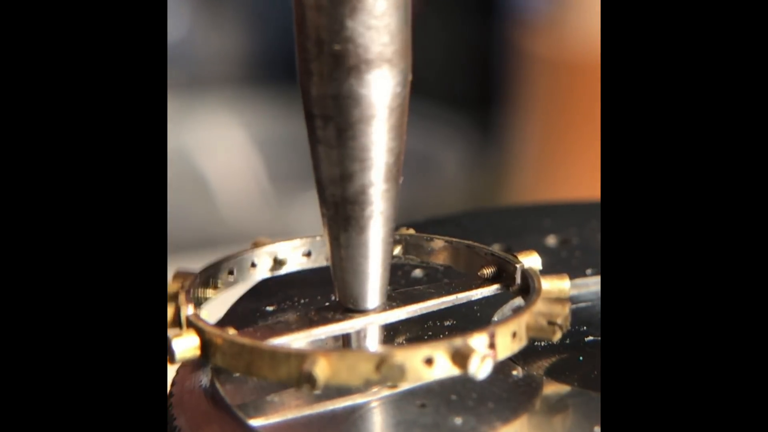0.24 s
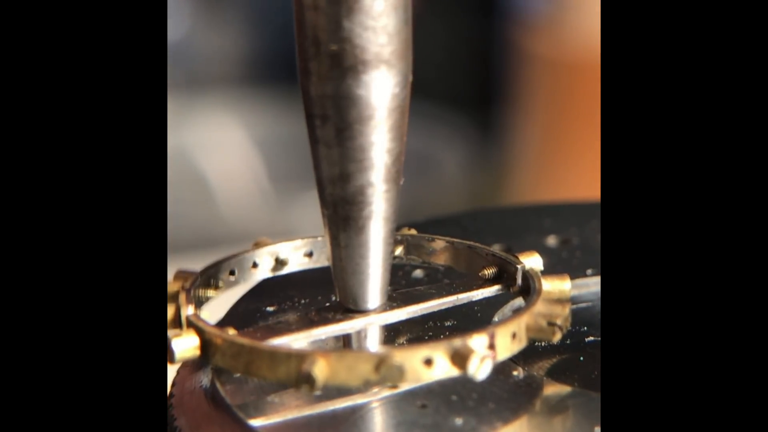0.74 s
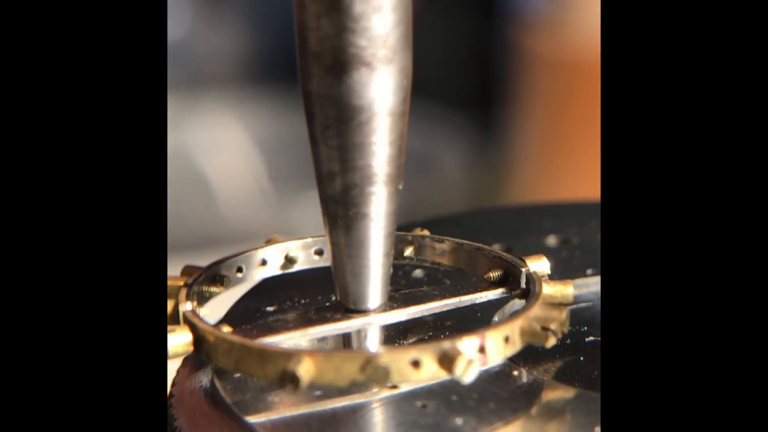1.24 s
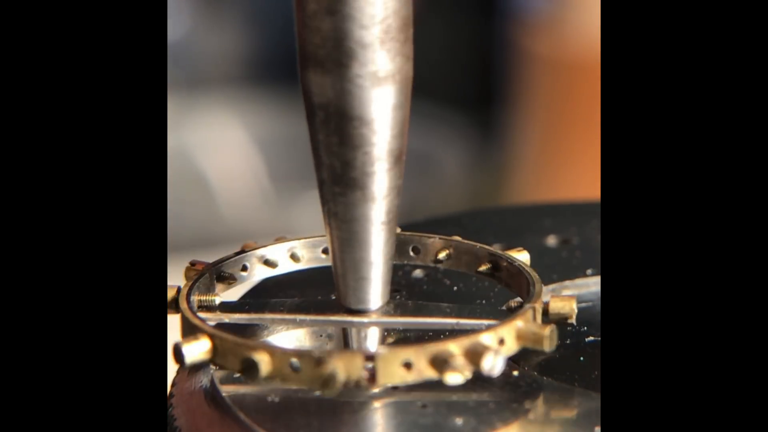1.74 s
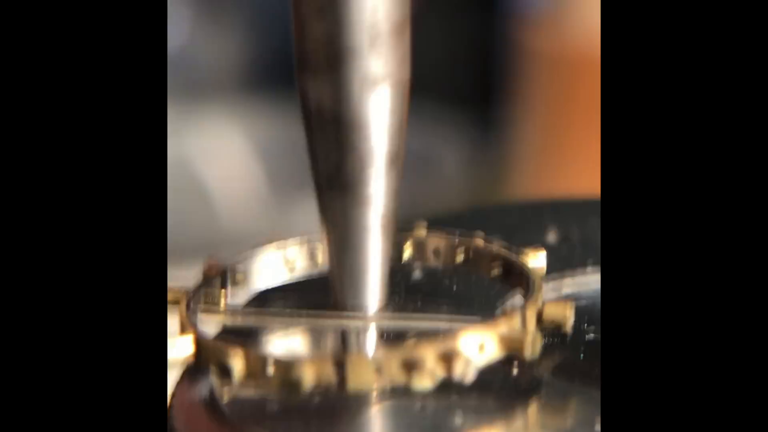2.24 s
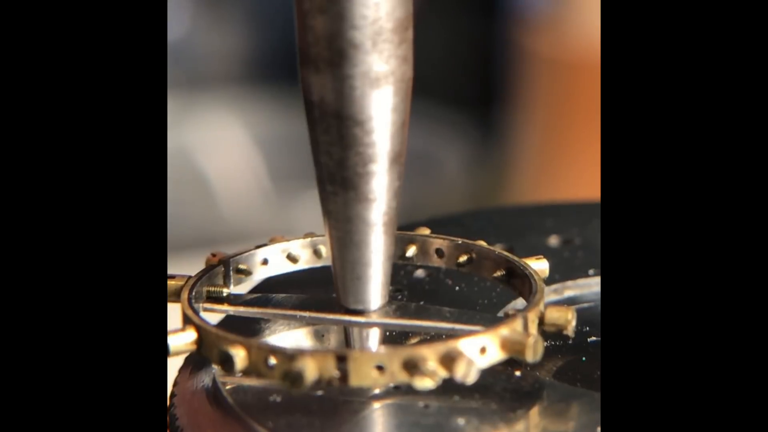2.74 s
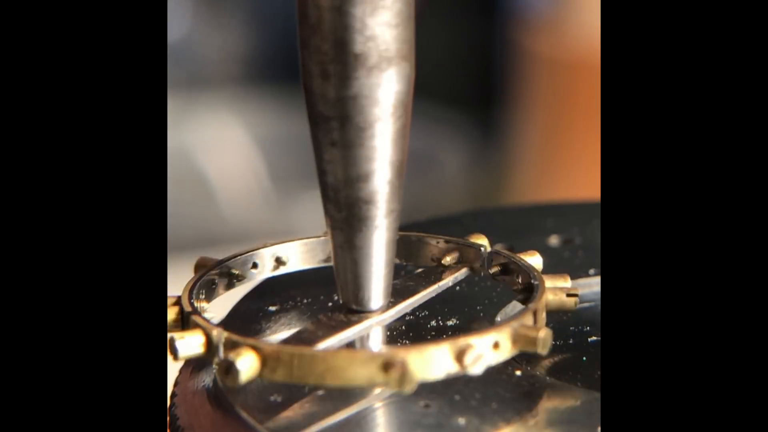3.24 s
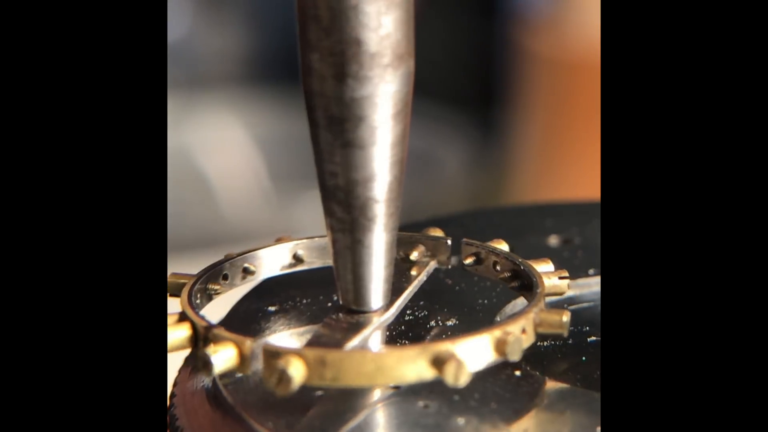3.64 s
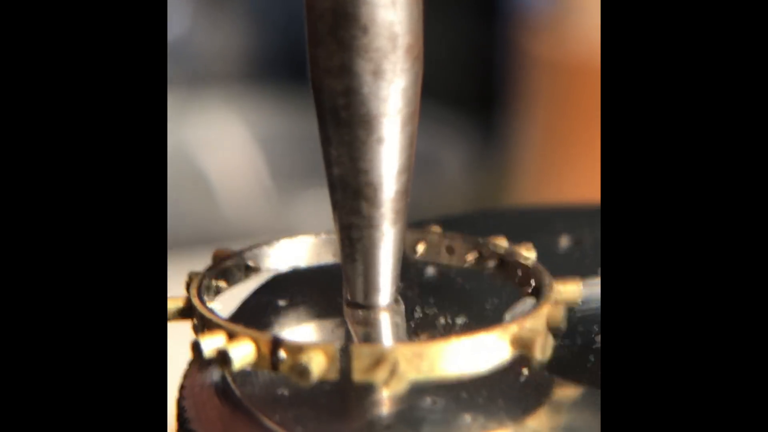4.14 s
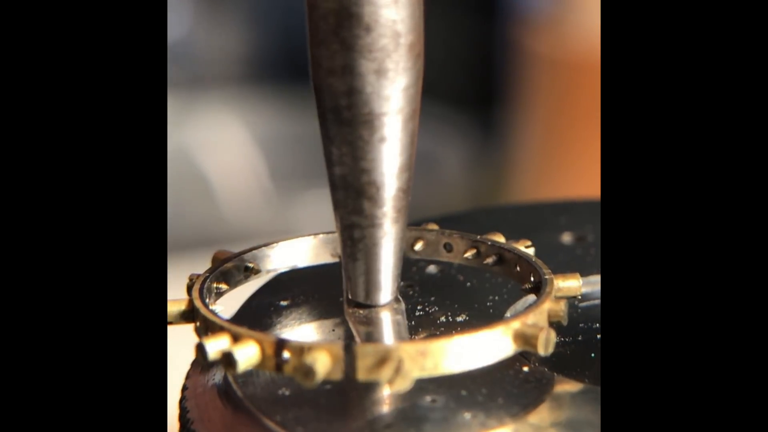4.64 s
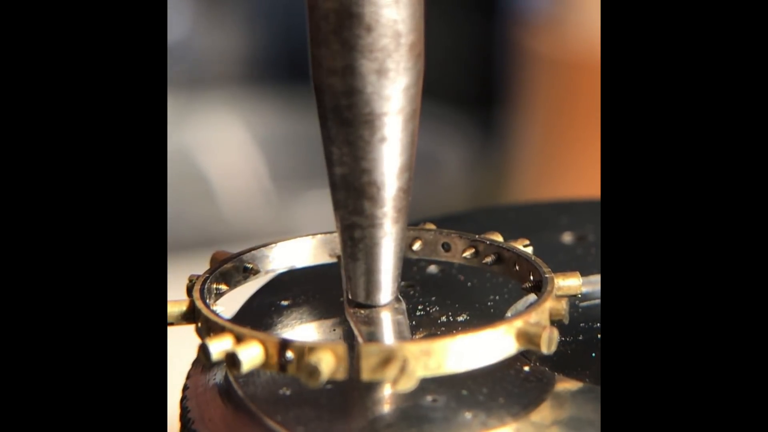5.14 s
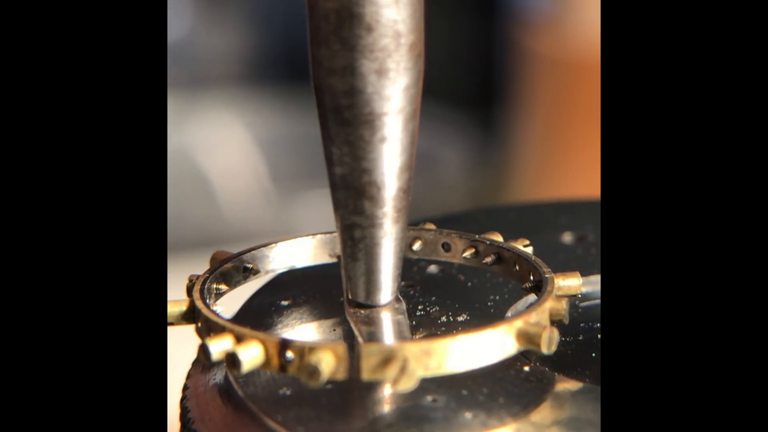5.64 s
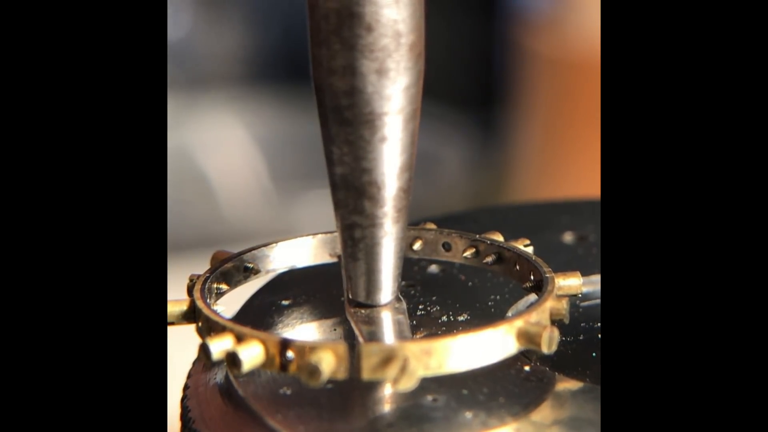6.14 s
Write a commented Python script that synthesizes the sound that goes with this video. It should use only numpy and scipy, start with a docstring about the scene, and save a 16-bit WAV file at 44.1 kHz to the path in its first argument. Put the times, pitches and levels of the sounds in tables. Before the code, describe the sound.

A small hammer taps a steel punch at a workbench: three quick taps, a pair, then another pair. Each is a sharp, close metallic clink with a brief high ring and a light thud from the bench. A tiny steel part tinks faintly, and the hammer is laid down with a clack, its wooden handle knocking softly as it rocks to rest. The small room echoes briefly over a faint rumble and hiss.

```python
"""At a watchmaker's bench in a small, lively room, a small hammer taps a steel punch seven times. Faint ticks
are heard just ahead of each close-up tap; then comes a clink of steel and a thud as the punch's stand hits the
bench. Then a small steel part tinks and the hammer is laid down: its head clacks and bounces, its wooden handle
rocks to rest. The room echoes each sound over a low rumble and hiss. A limiter turns down the loudest moments,
so the blows peak at much the same level."""
import sys
import numpy as np
from scipy import signal
from scipy.fft import rfft, irfft, next_fast_len
from scipy.io import wavfile
from scipy.ndimage import uniform_filter1d, minimum_filter1d

SR = 44100
rng = np.random.default_rng(int(sys.argv[2]) if len(sys.argv) > 2 else 0)


def to_wav(sig):
    """Store sig (one row per channel, or 1-D mono) as 16-bit WAV at the path in sys.argv[1].

    Samples outside -1..1 are clipped; the rate is SR.
    """
    pcm = np.clip(np.atleast_2d(sig), -1, 1) * 32767
    pcm = np.round(pcm).astype(np.int16)
    wavfile.write(sys.argv[1], SR, pcm.T)  # frames by channels


N = 281799
T = np.arange(int(1.2 * SR)) / SR  # time since a blow, in seconds

# Levels are relative. A fade_s is the time a sound takes to drop by 60 dB.
# the room's rumble and hiss: pitch_hz, level_db
AIR_SPECTRUM = [(15, -54), (25, -16.5), (44, 1.5), (64, 2), (91, -16.5), (107, 1), (140, -11.5), (209, -3),
                (246, -10), (289, -6.5), (537, -21.5), (648, -15), (1240, -24.5), (3630, -28.5),
                (15500, -38)]
# hammer blows on the punch: start_s, strength_db, ping_db
TAPS = [(.2561, 0, -24.5), (0.6396, 1, -27), (0.9913, 2, -26), (2.35, 0, -19), (2.75, 2.5, -21.5),
        (4.2332, -0.5, -19), (4.6170, 2.5, -19.5)]
# faint ticks just before every blow: ahead_s, level_db
LEAD_TICKS = [(.0232, -31), (.011, -32)]
# the steel's crack, a crowd of very short tones: pitch_hz, level_db
CRACK_SPECTRUM = [(25, -26.5), (100, -9), (300, -1), (420, 2.5), (1000, -0.5), (1800, -3), (3200, 4),
                  (6000, -15.5), (9500, -2.5), (12000, -9), (14000, -8), (16500, -1.5)]
# tones of the punch and its steel stand: pitch_hz, level_db, fade_s
STEEL_TONES = [(200, -16.5, 0.028), (550, -24.5, 0.021), (653.8, -53, 2.3), (1002.3, -14, 0.064),
               (1352, -22.5, .04), (2091, -16, 0.055), (2857, -12.5, 0.027), (3280, -16, 0.023),
               (4070, -21, 0.04), (4242, -20, 0.057), (5340, -5, 0.03), (6164, -19, 0.061),
               (7445, -14.5, 0.064), (9610, -19.5, 0.023), (9240, -33, 0.12), (10860, -8.5, 0.021),
               (11820, -23.5, 0.036), (13000, -27.5, 0.0057)]
# tones of the hammer head: pitch_hz, level_db, fade_s
HEAD_TONES = [(8317, 0, .17), (11950, -25, .2)]
# tones of the bench top under the stand: pitch_hz, level_db, fade_s
BENCH_TONES = [(56.3, -36.5, .3), (96, -13.5, 0.032), (111, -25.5, 0.14), (132, -28, 0.12),
               (165.6, -24.5, 0.12), (200, -8, .022), (251.5, -25.5, 0.23), (348.3, -36, .35),
               (574, -21, 0.036), (946.7, -10, 0.014), (1256, -34, 0.078), (1414, -20.5, .025)]
# the room's early and late echoes: pitch_hz, level_db
EARLY_SPECTRUM = [(40, -10.5), (120, -4), (260, 8.5), (500, -9), (1050, 3.5), (1700, -1.5), (2200, 1.5),
                  (3000, 1.5), (4300, 0), (6300, 1.5), (7500, -12), (11000, -8), (13000, -9), (15600, -8.5)]
LATE_SPECTRUM = [(40, -6.5), (140, -10), (260, -6.5), (500, -8), (1000, 4), (1650, -1), (2100, 5),
                 (2600, -2.5), (3300, -4), (4200, 3), (4800, -6), (5300, 2.5), (6300, -0.5), (7500, -10),
                 (15600, -13)]
# how long those echoes last: pitch_hz, fade_s
EARLY_FADES = [(100, 0.6), (1000, 0.44), (5000, 0.19), (10000, 0.36), (15600, 0.13)]
LATE_FADES = [(100, 0.55), (1000, 0.94), (2500, 0.91), (6000, 0.83), (15000, 0.22)]
# a thin hiss that hangs on after every blow: pitch_hz, level_db
HISS_SPECTRUM = [(100, -10), (3000, -1.5), (8000, 1), (15000, -2)]
# light touches on a small steel part: start_s, level_db
TINKS = [(5.279, -56), (5.906, -33.5)]
# tones of that part: pitch_hz, level_db, fade_s
PART_TONES = [(4190, 0.5, .035), (5600, -5, .02), (6500, -4, 0.022)]
# the hammer head landing, bouncing and tipping over: start_s, level_db, dull_above_hz
HEAD_CLACKS = [(5.6740, -3, 8550), (5.6770, -9.5, 4455), (5.6909, -5.5, 2600), (5.831, -31.5, 4030)]
# tones of the hammer hitting wood: pitch_hz, level_db, fade_s
WOOD_TONES = [(171, -38.5, 0.037), (304, -26.5, 0.026), (412, -27, 0.053), (659, -23.5, 0.052),
              (1046, -9, 0.0095), (1415, -13, 0.018), (2082, -7, 0.033), (2410, -10, 0.0197),
              (3150, -19.5, 0.019), (4064, -5, 0.02), (5400, -13.5, 0.021), (6070, -4.5, 0.024),
              (11850, -13, 0.016)]
# the noisy part of that hit: pitch_hz, level_db
CLACK_SPECTRUM = [(60, -15), (400, -14.5), (1200, 0.5), (2300, 7), (4000, 10), (6500, 4), (9000, -0.5),
                  (16000, -9.5)]
# the wooden handle knocking on the bench: start_s, level_db
HANDLE_KNOCKS = [(5.757, -22.5), (5.776, -28), (5.8721, -14.5), (5.95, -22), (5.9744, -23.5),
                 (5.985, -27.5), (6.0031, -27)]
# the handle rocking on the bench: pitch_hz, level_db
ROCKING_SPECTRUM = [(50, -21), (130, -0.5), (300, 1.5), (430, 4.5), (620, -10), (1100, -7), (2200, -32),
                    (3200, -21), (15000, -40)]


def amp(db):
    """Turn decibels into a number to multiply by."""
    return 10 ** (np.asarray(db) / 20)


def unit(x):
    """Scale a sound to an average (rms) level of 1."""
    return x / np.sqrt(np.mean(x ** 2) + 1e-20)


def along(points, hz):
    """Read between the rows of a (pitch_hz, value) table, on a log pitch scale."""
    pitches, values = np.transpose(points)
    return np.interp(np.log(hz + 1), np.log(pitches + 1), values)


def filtered(x, gain_at):
    """Turn each frequency up or down by gain_at(hz)."""
    size = next_fast_len(len(x) + 8192)
    return irfft(rfft(x, size) * gain_at(np.fft.rfftfreq(size, 1 / SR)), size)[:len(x)]


def noise(spectrum, size=len(T)):
    """Noise shaped by a spectrum table, at an average level of 1."""
    return unit(filtered(rng.standard_normal(size), lambda hz: amp(along(spectrum, hz))))


def fade(t, fade_s):
    """A smooth fall that is 60 dB down after fade_s."""
    return np.exp(-np.log(1000) * t / fade_s)


def add(track, start_s, sound):
    """Mix a sound into the track at start_s."""
    part = track[round(start_s * SR):][:len(sound)]
    part += sound[:len(part)]


def ring(tones, scatter_db=2.0):
    """A struck object rings with fading tones, each a little louder or softer at every hit."""
    out = np.zeros(len(T))
    for k, (hz, db, fade_s) in enumerate(tones):
        t = T[:int(2 * fade_s * SR)]
        gain = (-1) ** k * amp(db + scatter_db * rng.standard_normal())  # every other tone is flipped
        out[:len(t)] += gain * np.sin(2 * np.pi * hz * t) * fade(t, fade_s)
    return out


def snap(db):
    """The instant of contact: one click that holds all frequencies."""
    return amp(db) * (T == 0)


def background():
    """The quiet room's steady rumble and hiss."""
    return amp(-62.5) * noise(AIR_SPECTRUM, N)


def taps(walls):
    """Each blow rings the steel; a moment later the stand thuds against the bench."""
    ping_hz, ping_fade_s, thud_delay_s = 15610, .11, .0053
    clink_evening = 0.85  # a harder blow has a louder thud and echo, but its clink stays about as loud
    out = np.zeros(N)
    shared_noise = noise(CRACK_SPECTRUM)  # the crack is much the same at every blow
    for start_s, strength_db, ping_db in TAPS:
        crack = amp(-4.5) * unit(shared_noise + 0.18 * noise(CRACK_SPECTRUM)) * fade(T, 0.022)
        steel = ring(STEEL_TONES)
        clink = amp(-2 - clink_evening * strength_db) * (steel + crack)
        head = head_ring(db=-29)
        ping = ring([(ping_hz, ping_db, ping_fade_s)])  # top steel tone; level depends on the spot hit
        thud = np.zeros(len(T))
        add(thud, thud_delay_s, -amp(0.5) * ring(BENCH_TONES))
        for ahead_s, tick_db in LEAD_TICKS:
            add(out, start_s - ahead_s, amp(strength_db + tick_db) * crack)
        add(out, start_s, amp(strength_db) * (clink + head + ping + thud))
        # each part spreads into the room with its own strength
        into_room = (snap(16.16) + amp(-11) * steel + amp(-5) * crack
                     + amp(-12) * thud + amp(-1) * head + amp(3) * ping)
        add(out, start_s, amp(strength_db) * signal.fftconvolve(into_room, walls))
    return out


def head_ring(db):
    """The struck hammer head gives a clear, high ring."""
    return amp(db) * ring(HEAD_TONES, scatter_db=1.0)


def echo_tail(spectrum, fades, rise_s):
    """A one-second wash of echoes in which each frequency dies away at its own speed."""
    hz, t, bands = signal.stft(rng.standard_normal(SR), SR, nperseg=256)
    bands = bands * fade(t, along(fades, hz)[:, None])
    size = np.linalg.norm(signal.istft(bands, SR)[1])
    wash = signal.istft(bands * amp(along(spectrum, hz))[:, None], SR)[1][:SR]
    swell = 1 - np.exp(-(T[:SR] / rise_s) ** 2)
    return wash / size * swell


def echoes_and_hiss():
    """Early echoes, a longer tail and a weak late echo; a thin hiss hangs on briefly, then stops."""
    late_echo_s, hiss_s = .2, .425
    out = amp(-8) * echo_tail(EARLY_SPECTRUM, EARLY_FADES, rise_s=.003)
    out += amp(-15) * echo_tail(LATE_SPECTRUM, LATE_FADES, rise_s=0.023)
    add(out, late_echo_s, amp(-28) * echo_tail(LATE_SPECTRUM, EARLY_FADES, rise_s=0.02))
    add(out, 0, amp(-84) * noise(HISS_SPECTRUM, int(hiss_s * SR)))
    return out


def tinks(walls):
    """Light touches ring a small steel part."""
    out = np.zeros(N)
    for start_s, db in TINKS:
        tink = amp(db) * ring(PART_TONES)
        add(out, start_s, tink + amp(-12) * signal.fftconvolve(tink, walls)[:len(T)])
    return out


def wood_knock(walls, dull_above_hz):
    """One knock on the bench top with its echo; the softer the contact, the duller it sounds."""
    knock = ring(WOOD_TONES) + amp(-3.5) * noise(CLACK_SPECTRUM) * fade(T, 0.02)
    echo = signal.fftconvolve(snap(9) + amp(-15.5) * knock, walls)[:len(T)]
    treble_cut = signal.butter(3, dull_above_hz, fs=SR, output="sos")
    return signal.sosfilt(treble_cut, knock + echo)


def hammer_laid_down(walls):
    """The head clacks on the wood and bounces; the handle knocks more dully and rocks after each knock."""
    out = np.zeros(N)
    for start_s, db, dull_above_hz in HEAD_CLACKS:
        add(out, start_s, amp(db) * wood_knock(walls, dull_above_hz))
    # only the first landing is hard enough to ring the head and send a bright tick into the room
    landing_s = HEAD_CLACKS[0][0]
    add(out, landing_s, head_ring(db=-21))
    add(out, landing_s, signal.fftconvolve(snap(9) + head_ring(db=-26.5), walls))
    rise_s = 0.0019
    rocking_level = amp(-20.5) * (1 - np.exp(-T / rise_s)) * fade(T, fade_s=0.26)
    for start_s, db in HANDLE_KNOCKS:
        knock = wood_knock(walls, dull_above_hz=1340)
        add(out, start_s, amp(db) * (knock + rocking_level * noise(ROCKING_SPECTRUM)))
    return out


def limiter(x, ceiling_db, hold_s):
    """Turn the volume down around every peak that passes the ceiling."""
    width = int(hold_s * SR)
    needed_gain = np.minimum(1, amp(ceiling_db) / (np.abs(x) + 1e-9))
    return x * uniform_filter1d(minimum_filter1d(needed_gain, width), width)


def scene():
    """Taps, small tinks and the hammer laid down, over the quiet room."""
    walls = echoes_and_hiss()
    return (taps(walls) + tinks(walls) + hammer_laid_down(walls) + background())[None]


def record(dry):
    """Drop the deepest bass, limit and round off the tallest peaks, then cut the highest treble."""
    low_hz, top_hz, hardness = 50, 16200, 4
    bass_cut = signal.butter(3, low_hz, "high", fs=SR, output="sos")
    limited = limiter(signal.sosfilt(bass_cut, dry[0]), ceiling_db=0.5, hold_s=.012)
    rounded = limited / (1 + np.abs(limited) ** hardness) ** (1 / hardness)
    return filtered(rounded, lambda hz: 1 / (1 + (hz / top_hz) ** 160))[None]


dry = scene()
out = record(dry)
to_wav(out)
```